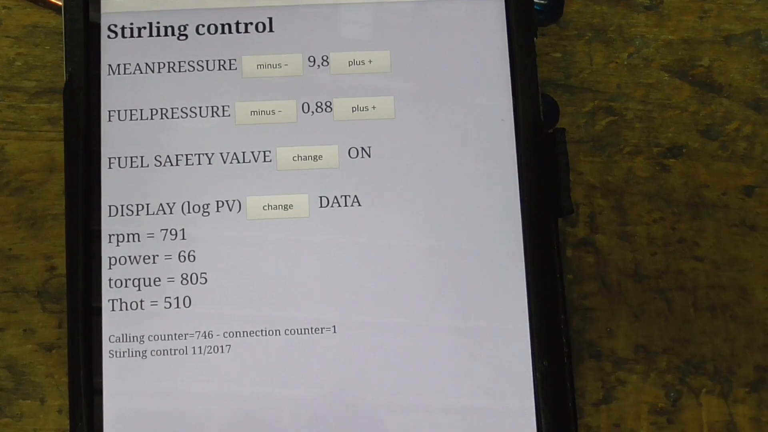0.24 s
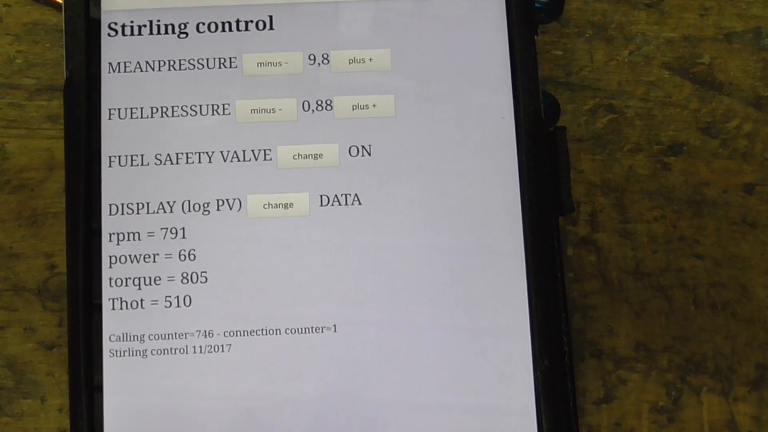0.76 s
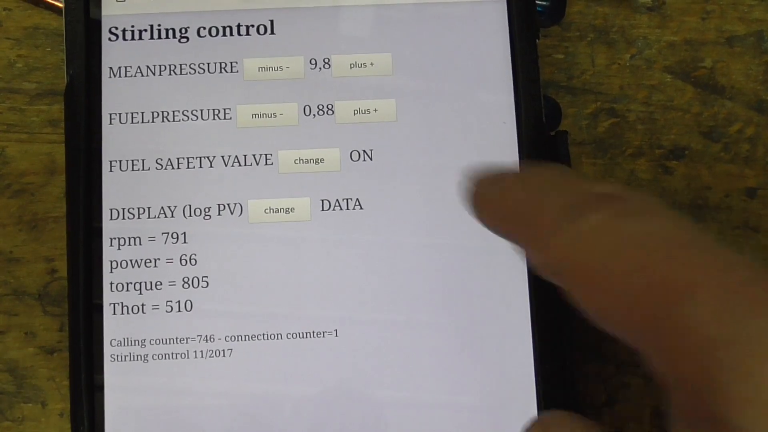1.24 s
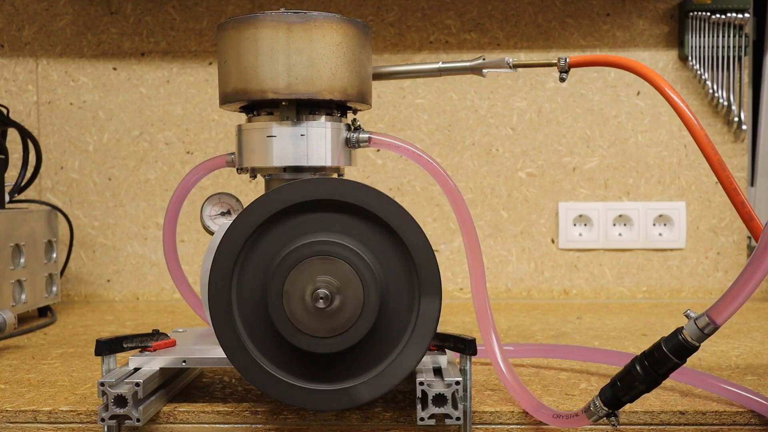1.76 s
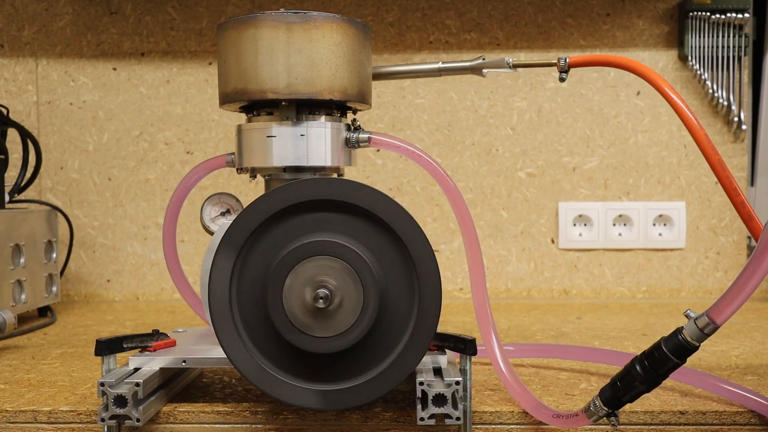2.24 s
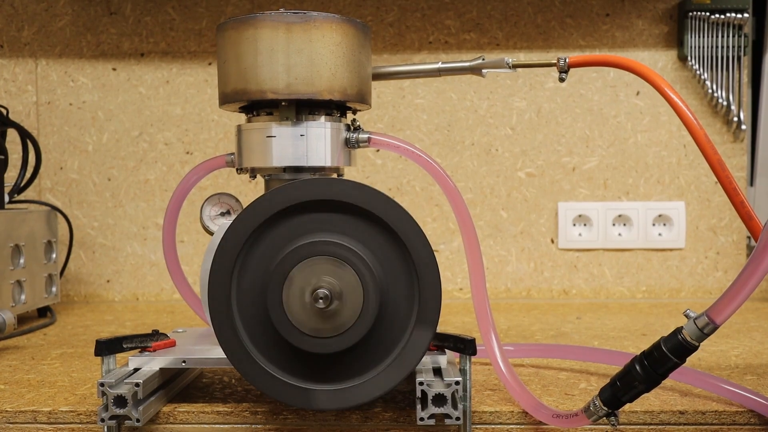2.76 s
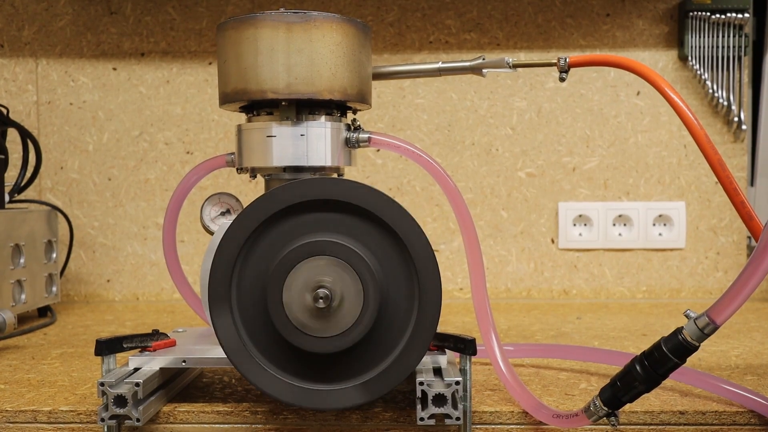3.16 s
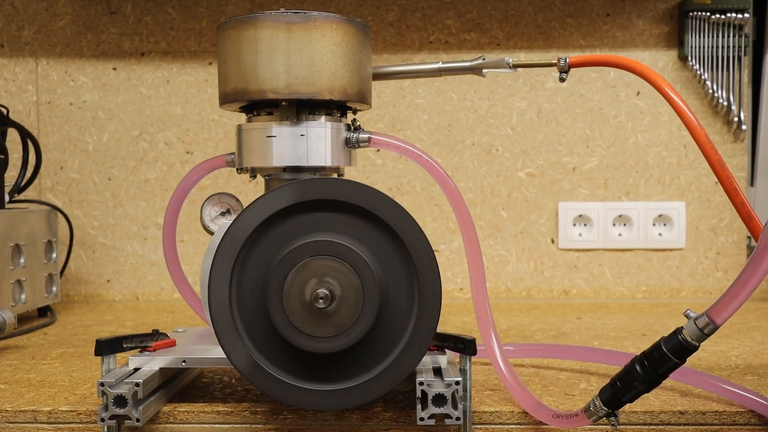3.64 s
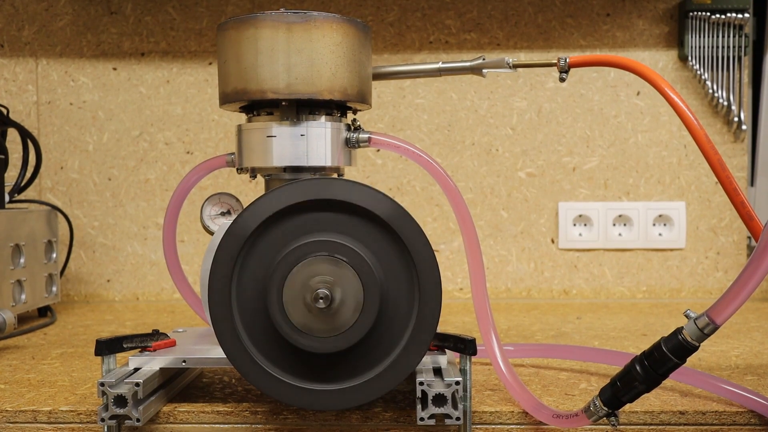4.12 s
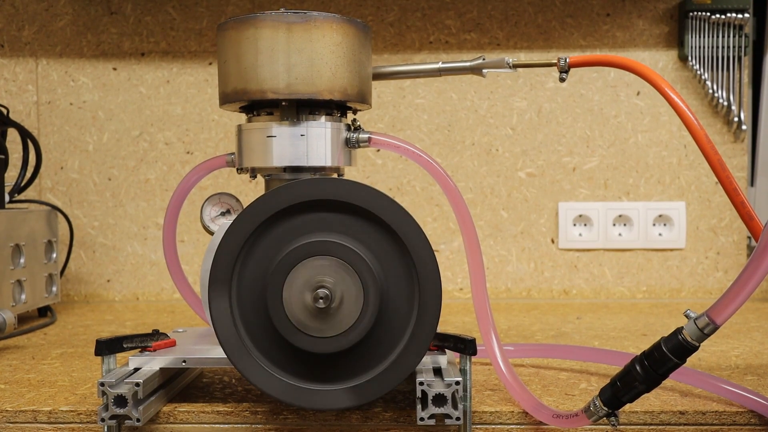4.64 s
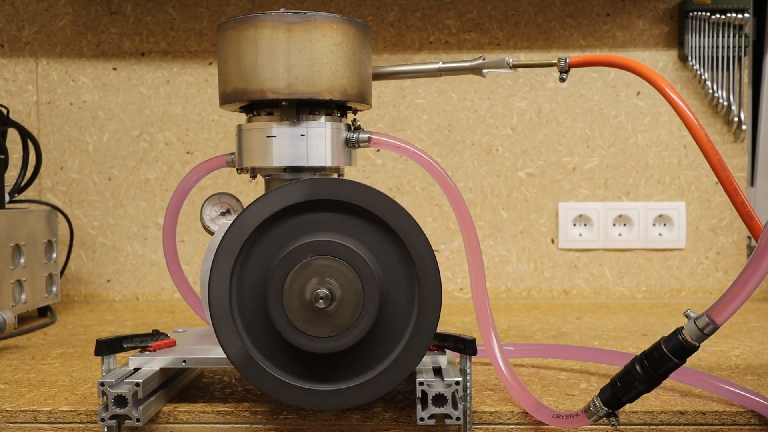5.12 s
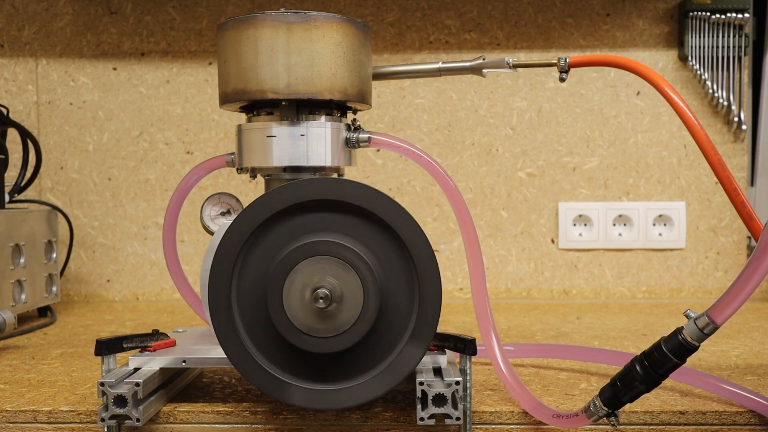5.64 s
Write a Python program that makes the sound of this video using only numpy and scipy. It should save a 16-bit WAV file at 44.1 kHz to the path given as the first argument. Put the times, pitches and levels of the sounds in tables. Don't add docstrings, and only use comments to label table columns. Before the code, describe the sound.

A small hot-air engine clatters rapidly on an indoor bench, fades to silence, then swells back closer with fuller bass and rough metallic ticking.

```python
import sys
import numpy as np
from scipy import signal
from scipy.fft import rfft, irfft, next_fast_len
from scipy.io import wavfile
from scipy.ndimage import uniform_filter1d

SR = 44100
rng = np.random.default_rng(int(sys.argv[2]) if len(sys.argv) > 2 else 0)


def log_audio(samples):
    frames = np.atleast_2d(samples).T
    limited = np.clip(frames, -1, 1)
    pcm = np.round(limited * 32767).astype(np.int16)
    wavfile.write(sys.argv[1], SR, pcm)


def boost(x):
    u = np.asarray(x, float) / 20
    return 10 ** u


N = 259308

# time at top dead centre [s], steady speed [turns/s], shortfall at first [turns/s],
# time when steady [s].
NEAR_CRANK = (1.5662, 12.151, .4136, 3.5506)
# frequency in Hz, level in dB.
NEAR_SIDE = [(60, -34), (160, -33), (270, -19), (450, -14), (740, -7), (1220, -4), (2010, 0), (3330, 1),
             (5500, 1), (9080, -8), (15000, -15)]


def far_place():
    far_crank = (0.0066, 13.525, 0, 1)
    # place in the turn 0-1, frequency in Hz, level in dB, t60 in s.
    frame = [(0.03, 265.5, -11.5, 0.23), (0.1965, 654, 1, .03), (.211, 458, -3.5, 0.15),
             (0.2613, 525, -5, 0.07), (0.298, 340, 3, 0.017), (0.3775, 198, -16, 0.09),
             (0.421, 550, -2, 0.11), (.548, 580, -13, 0.55), (0.604, 383.3, -12, .25),
             (.73, 314, -8.5, 0.1), (0.7687, 413, -2, 0.2), (0.9508, 507.4, 3, 0.11)]
    cylinder = [(0.0113, 755, -6, 0.18), (.065, 1155, -6, 0.13), (0.0753, 733, 2.5, 0.012),
                (.144, 1091, -4.5, 0.31), (.192, 854, -10, 0.34), (.1955, 951, -4.5, 0.28),
                (0.3166, 1110, -8.5, 0.17), (.328, 842, -11.5, 0.22), (0.4432, 918, -2.5, .03),
                (0.4774, 723, -5, 0.069), (0.5431, 1034, -0.5, .12), (0.6269, 1133, -1, 0.11),
                (.7025, 1091, -0.5, 0.16), (0.985, 987, 5.5, 0.036)]
    rods = [(.0015, 1990, -8, 0.012), (.0045, 1650, -7.5, 0.064), (0.126, 1616, -11, 0.097),
            (0.201, 1267, -10.5, 0.07), (0.4475, 1654, -8, 0.089), (0.5615, 2137, -12, 0.069),
            (.6245, 2030, -6.5, 0.033), (.668, 1326, -6, 0.02), (0.9623, 1876, -18, .25),
            (0.9758, 1482, -12, 0.22)]
    # place in the turn 0-1, frequency in Hz, level in dB, t60 in s.
    slack_knocks = [(0.97, 820, 9.5, .010), (0.97, 1200, -6.5, 0.011), (0.94, 830, 3, 0.01),
                    (0.93, 720, 0, 0.024), (.0755, 734, -4, 0.013), (0.92, 4000, -15.5, 0.047),
                    (.47, 4100, -28, 0.035), (.5625, 1700, -19, .05), (.0015, 2600, -17, 0.021),
                    (.4465, 1650, -10, 0.075)]
    # frequency in Hz, level in dB per Hz.
    rub_colour = [(30, -31), (100, -7.5), (300, -16.5), (600, -9), (1200, -15.5), (1500, -15),
                  (2200, -27.5), (2600, -23.5), (5500, -27.5), (8500, -22), (12000, -24.5), (15500, -27.5)]
    # centre in Hz, width in Hz, dB above the colour.
    casing_modes = [(536, 60, -6), (800, 36, -24), (1030, 266, 12), (1640, 60, -4), (2090, 174, 17),
                    (4090, 420, 8.5), (7200, 140, 6), (8700, 270, 5.5), (10100, 160, 3)]
    # place in the turn 0-1, load in dB.
    face_load = [(0, 5.5), (.15, 6.5), (.3, 3), (.5, 5), (.6, 3), (.75, 2), (.9, 5.5)]
    # frequency in Hz, level in dB.
    far_side = [(60, -12), (130, -13), (290, -11), (640, -7), (1410, -5), (3100, -4), (6820, -7),
                (15000, -10)]

    angle = crank(*far_crank)[:3 * SR]
    blows = knocks(angle, frame + cylinder + rods, uneven_db=.6, wander_db=.7, jitter_s=.00002)
    engine = boost(-32.5) * band(blows, 150, 4500)
    slack = knocks(angle, slack_knocks, uneven_db=1.5, wander_db=1.0, jitter_s=.00002)
    slack_db = -33.5 - 0.22 * np.clip(angle, 0, 30)
    engine += boost(slack_db) * band(slack, 91, 6000)
    engine += boost(-42.0) * rubbing(angle, rub_colour, casing_modes, face_load,
                                   repeat_hz=2000, grit_db=3.0, bright_load=0.8)
    heard = microphones(engine, far_side, pan_db=2.8, lag_s=.0002, near_s=.05)[:, SR:]
    return np.pad(heard, ((0, 0), (0, N - 2 * SR)))


def near_place():
    # place in the turn 0-1, frequency in Hz, level in dB, t60 in s.
    bench = [(.004, 207.2, -6.5, .25), (0.082, 396.4, -11, 0.6), (0.1624, 119.7, -6.5, 0.17),
             (0.2006, 186, -15, 0.97), (0.262, 216, 4, 0.13), (0.269, 434.8, -13.5, 0.56),
             (0.349, 376, 4, .06), (0.4045, 108.7, -4, 0.52), (0.479, 288.4, -8, 0.12),
             (.6285, 248, -11, .25), (0.699, 153, -5, 0.36), (0.7866, 393.3, -7, 0.2),
             (.801, 263.6, -3, 0.27), (0.9306, 337.2, -6.5, 0.31)]
    frame = [(0.1084, 752.5, -7, 0.13), (0.152, 902, -7, 0.012), (0.1732, 489, 2, 0.031),
             (0.202, 870, -17, 0.49), (0.2688, 987.4, -15.5, 0.15), (0.2855, 593.4, -11.5, 0.33),
             (.413, 523.6, -5, 0.16), (0.5433, 658, -16, 0.1), (.5855, 1086, -10.5, 0.4),
             (.855, 1006, -19.5, .45), (.901, 958.5, -8.5, 0.39), (0.915, 579, -4.5, 0.05),
             (0.965, 640, -9, 0.22), (.964, 813, -12, 0.33)]
    rods = [(0.012, 1317, -9, .06), (0.0423, 1413, -11.5, 0.067), (.095, 1783, -16, 0.46),
            (0.115, 1138, -13, 0.13), (0.2086, 1618, -24, 0.063), (.482, 1504, -10, 0.1),
            (.551, 1720, -17, .12), (.7635, 1153, -14, 0.077), (.802, 1558, -11.5, .12),
            (.8955, 1196, -7.5, 0.21), (0.9224, 1275, -11, 0.1), (0.9608, 1930, -16, 0.053)]
    # frequency in Hz, level in dB per Hz.
    rub_colour = [(30, -34), (75, -40), (110, -3), (310, -6), (500, -2), (1000, -2.5), (2000, -5),
                  (3300, -12), (3800, -20), (5300, -23), (11000, -26), (12500, -30.5), (14300, -31.5),
                  (15500, -49)]
    # centre in Hz, width in Hz, dB above the colour.
    casing_modes = [(365, 22, 1), (1004, 48, 8), (1610, 27, 9.9), (2628, 106, 7.2), (3890, 87, 7.5),
                    (4720, 67, 7.6), (5840, 310, 4.7), (7100, 440, 4.1), (8720, 270, 7.8), (10360, 500, 5),
                    (11100, 350, 8.5)]
    # place in the turn 0-1, load in dB.
    face_load = [(0, 1.5), (.08, -0.5), (.2, -0.5), (.35, -1.5), (.6, -4), (.8, -3), (.9, -4.5)]
    # roughness repeats below [Hz], grit [dB], share of the load in the highs.
    face_wear = (1300, 2.5, 1.5)

    angle = crank(*NEAR_CRANK)
    blows = knocks(angle, bench + frame + rods, uneven_db=1.5, wander_db=1.0, jitter_s=.00003)
    engine = boost(-30.5) * band(blows, 97, 4200) + shake(angle)
    engine += boost(-35) * rubbing(angle, rub_colour, casing_modes, face_load, *face_wear)
    return microphones(engine, NEAR_SIDE, pan_db=0.18, lag_s=.0004, near_s=0.066)[:, SR:]


def crank(top_s, steady, short, steady_s):
    run_up_s, run_up_bend = 2.0506, 1.209
    t = np.arange(-SR, N) / SR
    shortfall = short * np.clip((steady_s - t) / run_up_s, 0, 2) ** run_up_bend
    angle = np.cumsum(steady - shortfall) / SR
    return angle - np.interp(top_s, t, angle)


def knocks(angle, table, uneven_db, wander_db, jitter_s):
    full_speed, slow_speed = 12.12, 12.02
    # frequency in Hz, change in dB.
    slow_colour = [(100, 0.5), (160, -1.5), (210, 1), (270, 0), (340, -11), (530, 2), (620, -2.5),
                   (890, 2.5), (3000, -16)]
    samples = np.arange(len(angle))
    turns = np.arange(np.ceil(angle[0]) + 1, angle[-1] - 1)
    speed = SR / np.gradient(np.interp(turns, angle, samples))
    slowness = np.clip((full_speed - speed) / (full_speed - slow_speed), 0, 1)
    out = np.zeros(len(angle))
    for place, hz, level_db, t60 in table:
        draw = rng.standard_normal((len(turns), 3))
        wander = rms_one(signal.lfilter([1], [1, -.85], draw[:, 0]))
        at = np.interp(turns + place, angle, samples) + jitter_s * SR * draw[:, 1]
        strength_db = level_db + slowness * at_hz(slow_colour, hz)
        strength_db = strength_db + wander_db * wander + uneven_db * draw[:, 2]
        clicks = np.zeros(len(angle))
        clicks[np.round(at).astype(int)] = boost(strength_db)
        out += ring(clicks, hz, t60)
    return out


def rubbing(angle, colour, casing, load, repeat_hz, grit_db, bright_load):
    hz = np.fft.rfftfreq(len(angle), 1 / SR)
    faces = rng.standard_normal((int(angle[-1] - angle[0]) // 8 + 2, 2048))
    age = (angle - angle[0]) / 8
    row = age.astype(int)
    cell = (angle % 1 * 2048).astype(int)
    blend = age % 1 * np.pi / 2
    worn = np.cos(blend) * faces[row, cell] + np.sin(blend) * faces[row + 1, cell]
    bursts_db = grit_db * np.minimum(rng.exponential(1, len(angle)), 4)
    fresh = rms_one(rng.standard_normal(len(angle)) * boost(bursts_db))
    load_db = np.interp(angle % 1, *np.transpose(load), period=1)

    low = 1 / (1 + (hz / repeat_hz) ** 2)
    high = 1 / (1 + (3000 / (hz + 1)) ** 4)
    grit = np.sqrt(1 - high) * rfft(fresh * boost(load_db))
    grit = grit + np.sqrt(high) * rfft(fresh * boost(bright_load * load_db))
    source = np.sqrt(low) * rfft(worn * boost(load_db)) + np.sqrt(1 - low) * grit
    lift = sum((boost(db) - 1) / (1 + (2 * (hz - centre) / width) ** 2) for centre, width, db in casing)
    return rms_one(irfft(source * boost(at_hz(colour, hz)) * (1 + lift), len(angle)))


def shake(angle):
    # multiple of the turn rate, level in dB rms.
    shake_tones = [(2, -82), (3, -56.5), (4, -58), (5, -61)]
    return sum(np.sqrt(2) * boost(db) * np.sin(2 * np.pi * (k * angle + rng.random())) for k, db in shake_tones)


def taps():
    # frequency in Hz, level in dB, t60 in s.
    tap_modes = [(4420, 0, 0.0062), (5860, -6, 0.0062), (6760, -2, 0.0079), (8360, -3, 0.0089),
                 (9820, -5, 0.01), (11140, -2, 0.0055), (3480, -7.5, 0.0016), (2690, 3, 0.0064),
                 (1570, 4, 0.0079)]
    at, peak_db = tap_times()
    gaps = np.cumsum(rng.exponential(.0013, (len(at), 7)), axis=1)
    touches = at[:, None] + ((gaps - gaps[:, :1]) * SR).astype(int)
    out = np.zeros(N)
    for hz, level_db, t60 in tap_modes:
        clicks = np.zeros(N + SR)
        colour_db = np.clip(rng.normal(0, 3, (len(at), 1)), -8, 3) + rng.normal(0, 2, touches.shape)
        strength_db = peak_db + level_db - 12.0 - 0.86 * np.arange(7) + colour_db
        np.add.at(clicks, touches, boost(strength_db) * rng.choice([-1, 1], touches.shape))
        out += ring(clicks, hz * 0.986, t60)[:N]
        out += ring(clicks, hz * 1.008, t60 * 0.79)[:N]
    return signal.sosfilt(signal.butter(6, 12300, fs=SR, output="sos"), out)


def tap_times():
    # place in the turn 0-1, peak in dB, unevenness in dB.
    tap_places = [
        (.042, -33, 0.5),
        (.093, -41, 1.5),
        (.86, -53, 2),
    ]
    # first turn, last turn, rise [dB].
    bite = (14, 29, 8.5)
    # turn, change in dB.
    hard_turns = [(4, 10), (11, 8.5), (14, 2.5), (15, -5), (20, 1.5), (27, -2.5), (34, 9), (36, 5),
                  (37, 10.5), (48, 8)]
    angle = crank(*NEAR_CRANK)[SR:]
    turns = np.arange(int(angle[-1]) + 1)
    place, peak_db, uneven_db = np.transpose(tap_places)
    db = peak_db + uneven_db * np.clip(rng.standard_normal((len(turns), len(place))), -2, 1)
    biting = (turns >= round(bite[0])) & (turns <= round(bite[1]))
    db[:, 1] += bite[2] * biting
    for turn, more_db in hard_turns:
        db[round(turn), 1] += more_db
    at = np.interp(turns[:, None] + place, angle, np.arange(N)).astype(int)
    return at.ravel(), db.reshape(-1, 1)


def squeaks():
    # start in seconds, level in dB, length in seconds.
    squeak_events = [
        (.485, -52, .02),
        (.559, -48, .012),
        (.634, -49, .008),
        (.716, -54, .004),
    ]
    t = np.arange(N) / SR
    gate = sum(boost(db) * ((t > s) & (t < s + length)) for s, db, length in squeak_events)
    whistle = rms_one(ring(rng.standard_normal(N), 8600, 0.0067))
    return whistle * uniform_filter1d(gate, size=60)


def puffs():
    # centre in seconds, level in dB, length in seconds.
    puff_events = [
        (.13, -65, .04),
        (.32, -62, .04),
        (.48, -60, .04),
        (.95, -71, .05),
    ]
    t = np.arange(N) / SR
    swell = sum(boost(db) * np.exp(-((t - s) / length * 2) ** 2) for s, db, length in puff_events)
    return swell * rms_one(band(rng.standard_normal(N), 9500, 13500))


def whine():
    # frequency in Hz, level in dB rms.
    whine_tones = [(10094, -78), (10255, -75), (10417, -81), (11929, -72), (13011, -82), (15563, -81)]
    t = np.arange(N) / SR
    return sum(np.sqrt(2) * boost(db) * np.sin(2 * np.pi * (hz * t + rng.random())) for hz, db in whine_tones)


def walls(x, room_db, room_t60):
    t = np.arange(SR // 2) / SR
    tail = rng.standard_normal(len(t)) * boost(-60 * t / room_t60) * (t > .003)
    return x + boost(room_db) * signal.fftconvolve(x, tail / np.linalg.norm(tail))[:len(x)]


def microphones(x, side, pan_db, lag_s, near_s):
    size = next_fast_len(len(x) + SR)
    t = np.arange(SR // 2) / SR
    hz = np.fft.rfftfreq(size, 1 / SR)
    early = rng.standard_normal(len(t)) * np.exp(-t / near_s)
    reflections = rfft(early / np.linalg.norm(early), size)
    lag = .5j * np.tanh(2 * np.pi * hz * lag_s)
    mid = rfft(x, size)
    apart = mid * boost(at_hz(side, hz)) * (reflections + lag)
    ports = np.array([irfft(mid + apart, size), irfft(mid - apart, size)])[:, :len(x)]
    return ports * boost(np.array([[pan_db], [-pan_db]]) / 2)


def fader(t):
    # time at silence [s], time between silence and full [s], full gain.
    fade_out = (1.472, 1.27, 1.17)
    fade_in = (1.518, 1.09, 1.04)
    down = fade_out[2] * np.clip((fade_out[0] - t) / fade_out[1], 0, 1)
    up = fade_in[2] * np.clip((t - fade_in[0]) / fade_in[1], 0, 1)
    settling_s = np.clip(t - fade_in[0] - fade_in[1], 0, None)
    return down + up * boost(-0.26 * settling_s)


def at_hz(points, hz):
    return np.interp(np.log(hz + 1), np.log(np.array(points)[:, 0]), np.array(points)[:, 1])


def rms_one(x):
    return x / np.sqrt(np.mean(x ** 2) + 1e-20)


def ring(clicks, hz, t60):
    r = boost(-60 / (t60 * SR))
    w = 2 * np.pi * hz / SR
    return signal.lfilter([0, np.sin(w)], [1, -2 * r * np.cos(w), r * r], clicks + 1e-18)


def band(x, low_hz, high_hz):
    x = signal.sosfilt(signal.butter(4, low_hz, "high", fs=SR, output="sos"), x)
    return signal.sosfilt(signal.butter(2, high_hz, fs=SR, output="sos"), x)


def scene():
    change_s = 1.495
    t = np.arange(N) / SR
    engine = np.where(t < change_s, far_place() + whine(), near_place()) * fader(t)
    tapping = walls(taps(), room_db=-2.0, room_t60=0.18) * fader(t) ** 1.27
    small = tapping + squeaks() + puffs()
    return engine + microphones(small, NEAR_SIDE, pan_db=1.2, lag_s=.0003, near_s=.04)


def roll_off(x):
    return signal.sosfilt(signal.butter(12, 15710, fs=SR, output="sos"), x)


def record(dry):
    dry = signal.sosfilt(signal.butter(2, 28, "high", fs=SR, output="sos"), dry)
    mix = .35 * np.tanh(dry / .35)
    return roll_off(mix)


dry = scene()
out = record(dry)
log_audio(out)
```